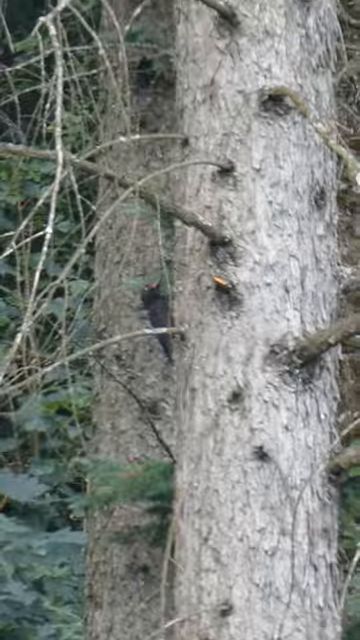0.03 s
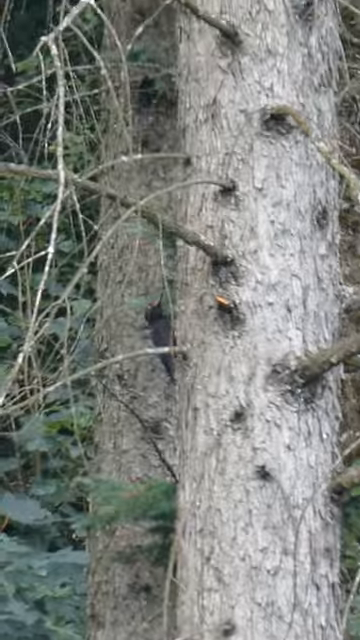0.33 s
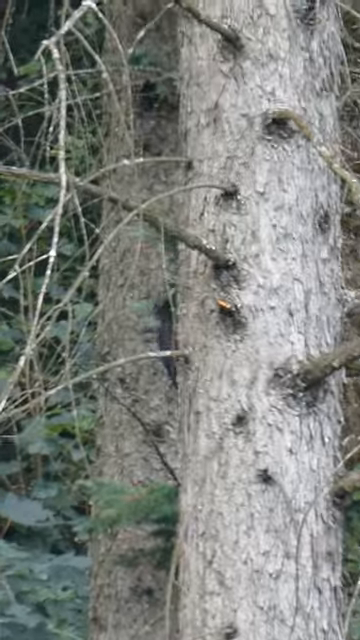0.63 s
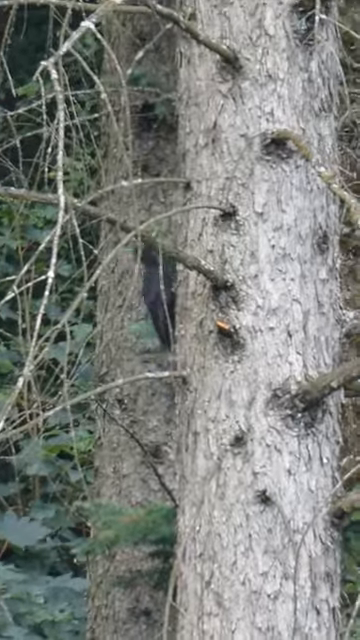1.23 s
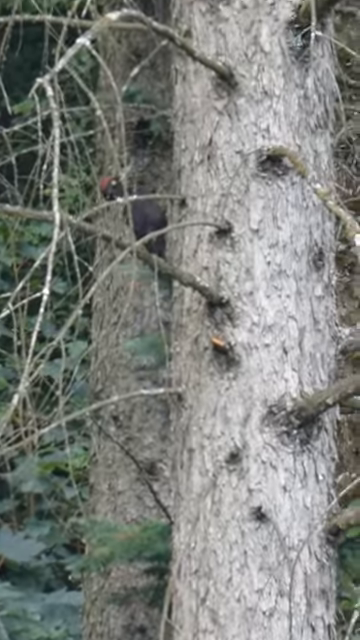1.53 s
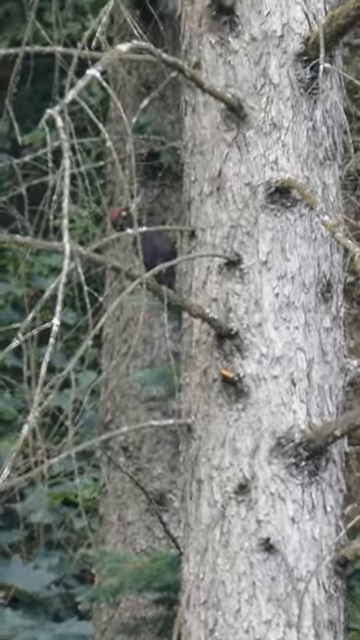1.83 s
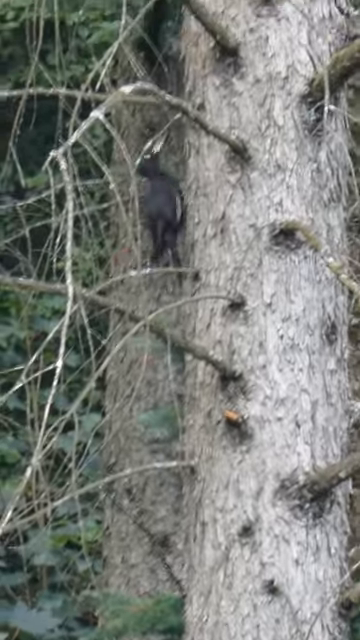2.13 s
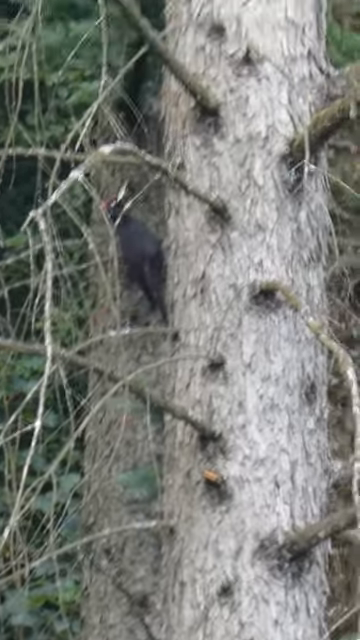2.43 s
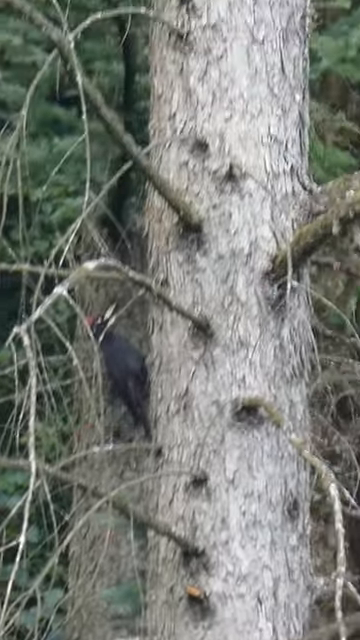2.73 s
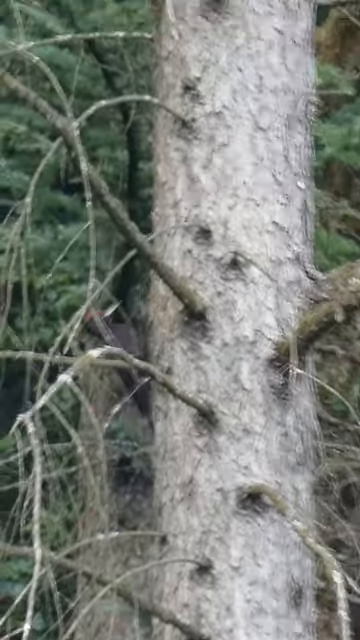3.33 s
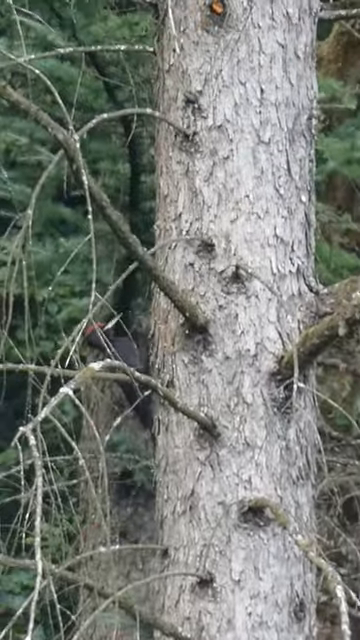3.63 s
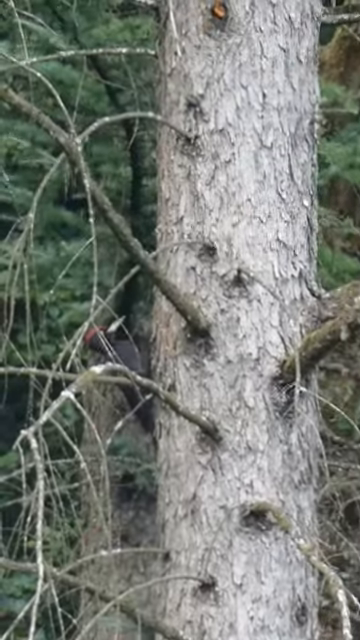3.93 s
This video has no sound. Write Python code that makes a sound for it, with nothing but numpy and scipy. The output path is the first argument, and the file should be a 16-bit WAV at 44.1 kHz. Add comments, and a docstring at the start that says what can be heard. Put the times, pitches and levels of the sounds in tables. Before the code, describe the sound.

A quiet, hollow rumble with a fine rattle flutters close to the microphone for all four seconds, like a camera's lens mechanism, over faint forest wind and hiss. A small bird flicks its wings seven times in the first 0.8 seconds. Thin, faint chirps follow from 1 to 2.2 seconds and again at 3.7. Soft handling bumps, two light knocks and tiny twig ticks fall mostly between 1.8 and 3.1.

```python
"""A quiet forest, heard from a hand-held camera. Up front is a hollow, fluttering rumble, probably
the lens mechanism ringing the camera body with friction, fine chatter and two knocks. Under it lie
a murmur of wind, soft hiss and a few handling bumps. A small bird flicks its wings seven times in
grainy swishes, others chirp in thin gliding whistles, and twigs tick; the trunks add a short echo."""
import sys
import numpy as np
from scipy import signal
from scipy.fft import rfft, irfft
from scipy.io import wavfile
from scipy.ndimage import uniform_filter1d

SR = 44100
rng = np.random.default_rng(int(sys.argv[2]) if len(sys.argv) > 2 else 0)


def wav_record(signal):
    """Record a signal, one row per channel, as 16-bit PCM in the file named by sys.argv[1]."""
    frames = np.transpose(np.atleast_2d(signal))
    bounded = np.clip(frames, -1, 1)
    # unit amplitude maps onto the largest positive 16-bit level
    quanta = np.round(bounded * 32767).astype(np.int16)
    wavfile.write(sys.argv[1], SR, quanta)


N = 176400
T, HZ = np.arange(N) / SR, np.fft.rfftfreq(N, 1 / SR)


def amp(db):
    """Decibels to gain."""
    return 10 ** (np.asarray(db) / 20)


def unit(x):
    """Scales to rms 1."""
    return x / np.sqrt(np.mean(x ** 2) + 1e-30)


def curve(points):
    """Breakpoints joined across the spectrum on a log-frequency axis."""
    hz, value = np.transpose(points)
    return np.interp(np.log(HZ + 1), np.log(hz), value)


def swell_db(points):
    """A fader ride through time, in dB about its own mean."""
    db = np.interp(T, *np.transpose(points))
    return db - db.mean()


def noise(gain):
    """Noise of rms 1 with the given spectrum."""
    return unit(irfft(rfft(rng.standard_normal(N)) * gain, N))


def drift(hz):
    """Random wander of rms 1, up to about the given rate."""
    return noise(np.exp(-(HZ / hz) ** 2))


def band(hz, octaves=0.27):
    """Noise in a soft band about a centre."""
    return noise(np.exp(-(np.log2((HZ + 1) / hz) / octaves) ** 2 / 2))


def pair(a, b, correlation):
    """Two channels of given correlation from two unrelated signals."""
    correlation = np.clip(correlation, -1, 1)
    return np.array([a, correlation * a + np.sqrt(1 - correlation ** 2) * b])


def steady(x, window_s=0.11):
    """Evens out slow chance swells, keeping the flutter and the overall level."""
    power = (x ** 2).mean(0)
    return x * np.sqrt(power.mean() / uniform_filter1d(power, int(window_s * SR)))


def forest_echo(x, t60_s=0.73, onset_s=0.0032):
    """Trunks scatter a short, diffuse stereo echo."""
    t = T[:SR]
    tail = rng.standard_normal((2, SR)) * amp(-60 * t / t60_s) * np.minimum(t / onset_s, 1)
    return signal.fftconvolve(x, tail / np.linalg.norm(tail[0]), axes=1)[:, :N]


def air(level_db=-60, flicker_db=0.5):
    """The bed: a low murmur of distant wind and a smooth hiss."""
    # Tone of the bed: frequency_hz, relative_db
    colour = [(20, -11), (45, -7.5), (100, -3), (230, 2), (600, 0), (1200, -17.5), (2200, -18), (3000, -17),
              (4700, -20), (5400, -16), (7000, -18.5), (8000, -22), (8450, -24), (8800, -23.5), (9800, -21),
              (12000, -28), (15000, -32.5)]
    # Likeness of left and right: frequency_hz, correlation
    likeness = [(30, -0.9), (120, -0.64), (200, 0.07), (600, -0.5), (2500, 0.31), (5500, 0.8), (8000, 0.64),
                (11000, .5), (15000, .25)]
    # Stereo balance: frequency_hz, left_minus_right_db
    balance = [(100, 4), (300, 2.5), (1000, 1.5), (5500, -1.5), (10000, 0)]
    spectra = pair(*rfft(rng.standard_normal((2, N))), curve(likeness))
    spectra *= amp(curve(colour) + np.array([[.5], [-.5]]) * curve(balance))
    return unit(irfft(spectra, N)) * amp(level_db + flicker_db * drift(27))


def high_hiss(peak_s=3.78, half_length_s=0.04):
    """A thin hiss swells and fades behind the last chirp."""
    return amp(-78) * np.exp(-((T - peak_s) / half_length_s) ** 2) * band(hz=11000)


def twigs(decay_s=0.0048):
    """Twigs give tiny dry ticks, each a fast-dying band of noise."""
    # Twig ticks: start_s, centre_hz, level_db
    ticks = [(2.428, 3000, -62), (2.921, 5240, -63)]
    return sum(amp(db) * (T > s) * np.exp(-abs(T - s) / decay_s) * band(hz) for s, hz, db in ticks)


def handling_bumps(half_length_s=0.0055):
    """Soft pushes on the camera move its two microphones in opposite ways."""
    # Low thumps: centre_s, pitch_hz, relative_db
    pushes = [(0.444, 130, -52.5), (1.849, 92, -51.5), (2.047, 104, -48.5), (3.126, 112, -53)]
    thumps = np.zeros(N)
    for s, hz, db in pushes:
        envelope = amp(db) * np.exp(-((T - s) / half_length_s) ** 2)
        thumps += envelope * np.sin(2 * np.pi * hz * (s - T))
    return thumps * np.array([[2], [-0.78]])


def birds(jitter_depth=0.098, second_voice_hz=598):
    """Thin whistles scoop up and most sag; jitter and a second voice just above make some rasp."""
    # Chirps, the far ones mostly echo:
    # start_s, length_s, rise_s, start_hz, top_hz, end_hz, level_db, rasp (0-1), echo_send_db
    chirps = [(1.008, .018, .004, 5200, 5310, 4300, -67.5, 0.86, 0),
              (1.227, 0.025, .005, 6500, 6750, 6500, -69, 0.28, -4),
              (1.34, 0.017, 0.0044, 6450, 6580, 6440, -68.5, 0.2, 3),
              (1.384, 0.046, 0.013, 5300, 8200, 6900, -69, 0.57, -2),
              (1.417, 0.031, 0.0061, 7330, 7720, 7340, -70, .3, 5),
              (1.496, 0.018, 0.0065, 3970, 4070, 3950, -67.5, .45, -6),
              (1.753, 0.069, 0.0098, 6830, 6900, 6550, -75, 0.1, -4),
              (2.02, .016, 0.004, 4930, 5260, 5200, -70, .2, -5),
              (2.094, 0.024, .050, 3120, 3900, 3900, -71.5, .02, -10),
              (2.125, 0.063, 0.042, 3780, 4440, 4450, -64.5, 0.15, -7),
              (2.182, 0.023, .018, 4600, 5080, 5080, -75, 0.2, -5),
              (3.704, 0.042, 0.011, 5400, 8220, 7300, -61, 0.36, -6),
              (3.74, 0.021, 0.012, 7450, 7900, 7800, -62, .25, -9)]
    direct, send = np.zeros((2, N))
    jitter = jitter_depth * drift(930)
    for start_s, length_s, rise_s, start_hz, top_hz, end_hz, db, rasp, send_db in chirps:
        on = (T >= start_s) & (T < start_s + length_s)
        t = T[on] - start_s
        scoop = (top_hz - start_hz) * np.sin(np.pi / 2 * np.minimum(t / rise_s, 1))
        sag = (end_hz - top_hz) * np.maximum(t - rise_s, 0) / max(length_s - rise_s, 1e-3)
        pitch_hz = (start_hz + scoop + sag) * (1 + rasp * jitter[on])
        phase = 2 * np.pi * np.cumsum(pitch_hz) / SR
        voices = np.sin(phase) + rasp * np.sin(phase + 2 * np.pi * second_voice_hz * t)
        call = amp(db) * np.sqrt(2 * abs(np.sin(np.pi * t / length_s))) * voices
        direct[on] += call
        send[on] += call * amp(send_db)
    return direct * amp([[-.5], [.5]]) + forest_echo(send[None])


def wings(grains_per_s=15000, ripple_step_hz=305, ripple_db=1.5):
    """Each flick is a grainy swish of feathers in a softer rustle, with uneven resonances of its own."""
    # Wing flicks: centre_s, level_db
    flicks = [(.146, -66), (.247, -61), (.350, -59.5), (0.45, -58.5), (0.558, -58.5), (0.669, -58.5),
              (0.778, -57.5)]
    # Tone of the feathers: frequency_hz, relative_db
    colour = [(2000, -32), (4500, -6.5), (5500, 4.5), (6900, -1), (7400, -6), (8500, -10.5), (9550, 0),
              (10000, -5), (11500, -6.5), (12300, -14), (15000, -22)]
    flick_s, rustle_s, rustle_db = 0.0053, 0.021, -9
    knots_hz = np.arange(0, SR / 2, ripple_step_hz)
    out = np.zeros((2, N))
    for s, db in flicks:
        flick_power = np.exp(-((T - s) / flick_s) ** 2)
        rustle_power = amp(rustle_db) ** 2 * np.exp(-((T - s) / rustle_s) ** 2)
        ripple = np.interp(HZ, knots_hz, rng.standard_normal(N)[:len(knots_hz)])
        grains = rng.standard_normal((2, N)) * (rng.random((2, N)) < grains_per_s / SR)
        swish = unit(irfft(rfft(grains) * amp(curve(colour) + ripple_db * ripple), N))
        out += pair(*swish, correlation=0.85) * amp(db) * np.sqrt(flick_power + rustle_power)
    return out


def body_rumble(split_hz=560, chatter_per_s=400):
    """Friction, chatter and knocks ring the camera body; low and high modes swell and flutter apart."""
    # Body resonances: pitch_hz, width_hz, left_db, right_db, left_lead_rad
    body_modes = [(293, 13, -57.2, -65.1, -1.4), (319, 46, -53.6, -58.5, -1.3),
                  (334, 11, -53.2, -59.7, -0.7), (415, 30, -52.1, -65.9, -0.9),
                  (483, 28, -56.3, -65.4, -3.1), (575, 124, -61.2, -61.4, 2.2),
                  (708, 135, -59.1, -63.5, 2.8), (826, 108, -62.5, -63.8, 0.2),
                  (958, 13, -61.3, -61.4, -0.0), (973, 67, -62.7, -60.3, -0.0),
                  (1038, 94, -72.1, -58.9, -3.1), (1152, 38, -59.6, -64.4, 1.2),
                  (1228, 118, -64.0, -66.5, 1.6), (1381, 94, -66.1, -66.8, 1.9),
                  (1460, 58, -77.1, -69.5, -3.1), (1581, 90, -66.0, -71.5, -1.5),
                  (1679, 67, -72.3, -70.0, -1.4), (1887, 108, -68.8, -74.2, -1.1),
                  (1993, 148, -69.0, -69.1, -1.0), (2368, 229, -81.1, -76.0, -0.5),
                  (2580, 118, -78.7, -86.1, -1.1)]
    # Fader ride of the low modes: time_s, relative_db
    low_ride = [(0.05, -56), (0.17, -46), (0.22, -53), (0.33, -47.5), (0.41, -56), (0.46, -47), (0.52, -59),
                (0.56, -48), (0.98, -49.5), (1.29, -52.5), (1.38, -48.5), (1.46, -53.5), (1.58, -47.5),
                (1.95, -51), (2.03, -49.5), (2.34, -47.5), (2.75, -52), (2.87, -45.5), (3.0, -54),
                (3.16, -45.5), (3.24, -51), (3.54, -51), (3.62, -48), (3.87, -46), (3.96, -51.5)]
    # Fader ride of the high modes: time_s, relative_db
    high_ride = [(0.05, -58), (0.13, -49.5), (0.22, -58), (0.27, -51.5), (0.42, -54.5), (0.55, -52.5),
                 (0.85, -54), (1.19, -51), (1.3, -53), (1.87, -52.5), (2.17, -50.5), (2.26, -51.5),
                 (2.32, -51), (2.55, -52.5), (2.61, -50.5), (2.66, -54.5), (2.88, -57), (3.08, -50.5),
                 (3.4, -54.5), (3.5, -49), (3.55, -56), (3.7, -52), (3.9, -54.5), (4.0, -49.5)]
    # Harder hits in the rattle: start_s, over_friction_db
    hits = [(2.301, 32), (3.033, 31)]
    low_flutter_db, high_flutter_db = 0.5, 1.83
    hum_hz, hum_width_hz, hum_follow, hum_trim_db = 958, 25, 0.58, -0.5
    low_gain = amp(swell_db(low_ride) - 0.49 + low_flutter_db * drift(18))
    high_gain = amp(swell_db(high_ride) - 0.32 + high_flutter_db * drift(29.5))
    chatter = unit(rng.choice([-1, 1], N) * (rng.random(N) < chatter_per_s / SR))
    knocks = sum(amp(db) * (np.arange(N) == round(s * SR)) for s, db in hits)
    low_modes, high_modes = np.zeros((2, 2, N))
    for hz, width_hz, left_db, right_db, lead_rad in body_modes:
        bus, chatter_gain = (low_modes, 0.51) if hz < split_hz else (high_modes, 0.35)
        detune = 2 * (HZ - hz) / width_hz
        resonance = np.exp(2j * np.pi * rng.random()) / (1 - detune ** 2 + 1j * np.sqrt(2) * detune)
        friction = np.sqrt(1 - chatter_gain ** 2) * rng.standard_normal(N)
        drive = pair(friction + chatter_gain * chatter + knocks, rng.standard_normal(N), 0.95)
        stereo_phase = np.exp([[0], [-1j * lead_rad]])
        ring = unit(irfft(rfft(drive) * resonance * stereo_phase, N))
        # The sharp hum stands out more as the high modes swell.
        near_hum = np.exp(-((hz - hum_hz) / hum_width_hz) ** 2)
        hum_gain = high_gain ** (hum_follow * near_hum) * amp(hum_trim_db * near_hum)
        bus += ring * hum_gain * amp([[left_db], [right_db]])
    return steady(low_modes) * low_gain + steady(high_modes) * high_gain


def scene(rustle_echo_db=-8.5):
    """Close, dry rumble and bumps over the air, with birds and rustles out among the trees."""
    rustles = wings() + twigs() + high_hiss()
    mix = body_rumble() + air() + handling_bumps() + birds() + rustles
    return mix + amp(rustle_echo_db) * forest_echo(rustles)


def record(dry, start_s=0.035, cutoff_hz=15600):
    """The sound cuts in after an instant of silence; a steep low-pass trims the very top."""
    lowpass = signal.firwin(511, cutoff_hz, window=("kaiser", 9), fs=SR)
    return signal.oaconvolve(dry * (T > start_s), lowpass[None], "same")


dry = scene()
out = record(dry)
wav_record(out)
```